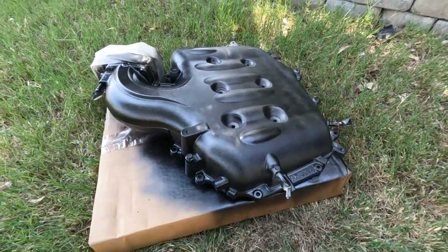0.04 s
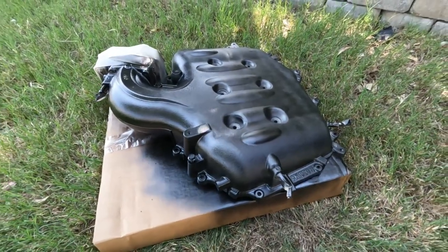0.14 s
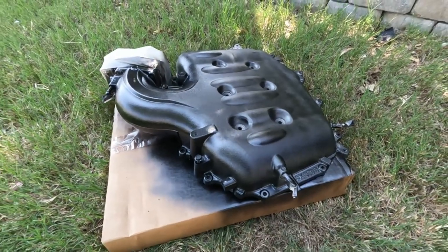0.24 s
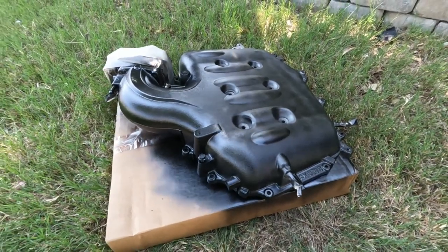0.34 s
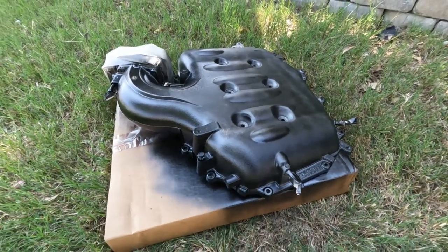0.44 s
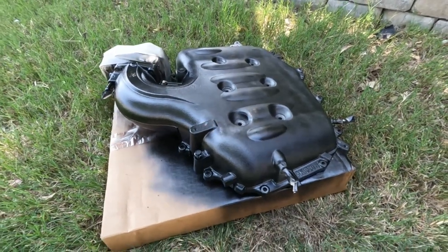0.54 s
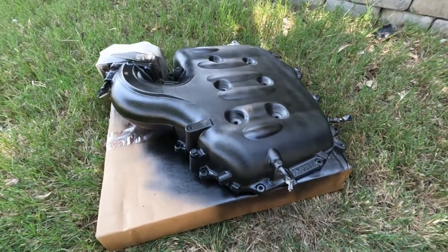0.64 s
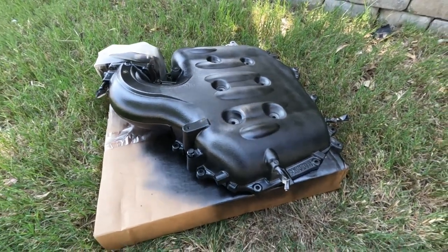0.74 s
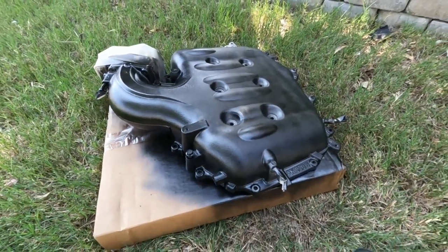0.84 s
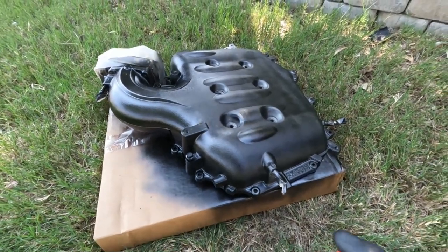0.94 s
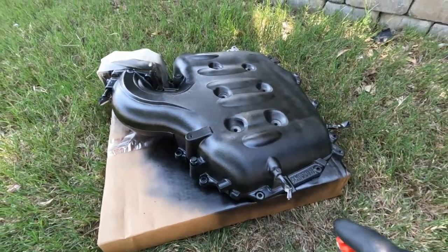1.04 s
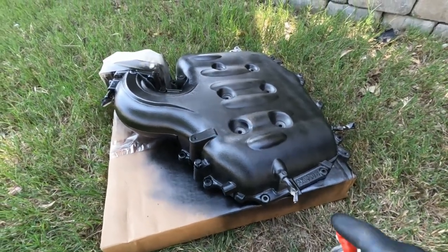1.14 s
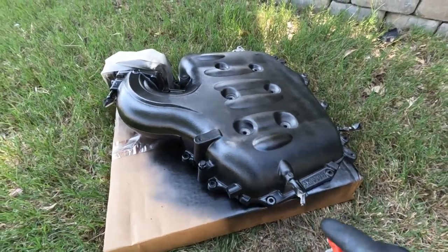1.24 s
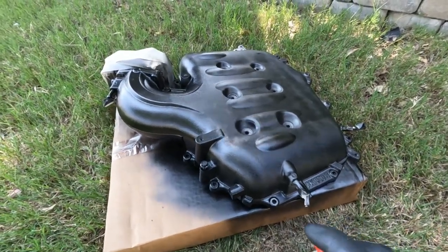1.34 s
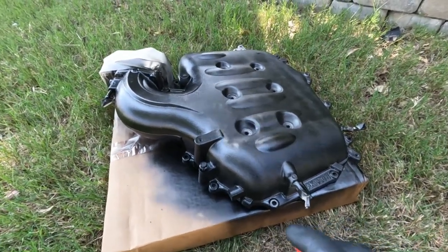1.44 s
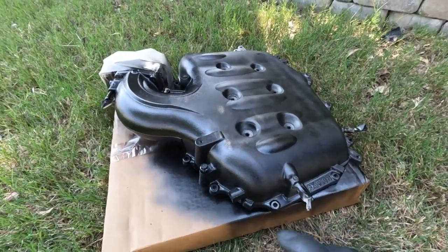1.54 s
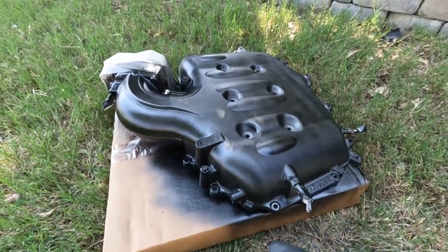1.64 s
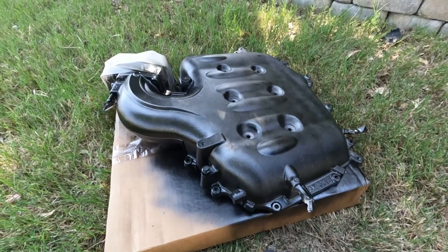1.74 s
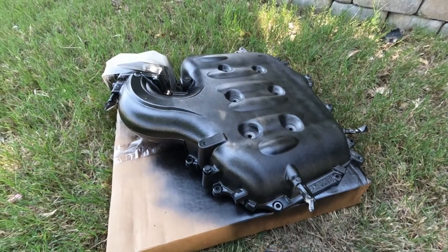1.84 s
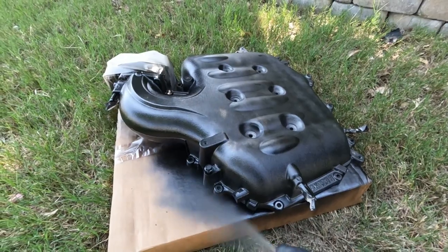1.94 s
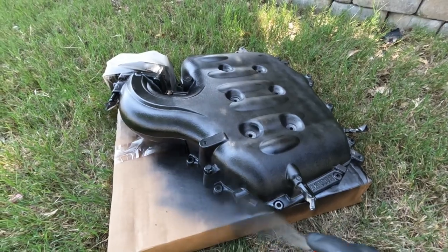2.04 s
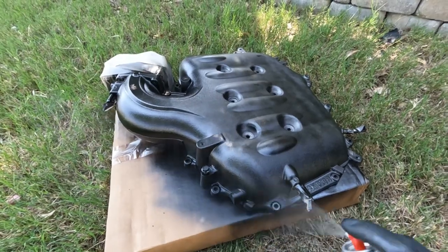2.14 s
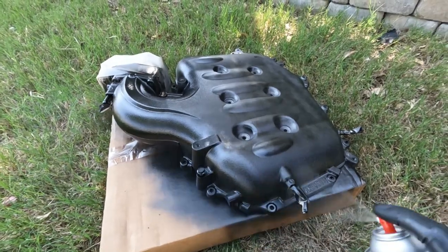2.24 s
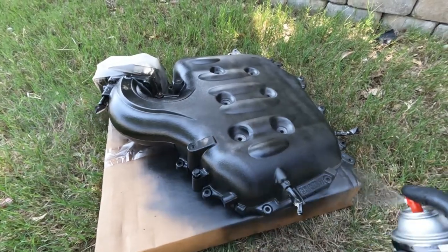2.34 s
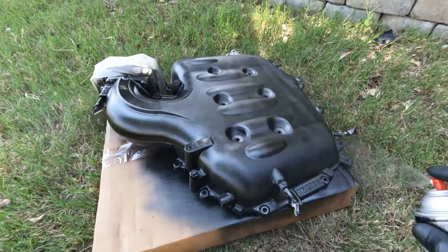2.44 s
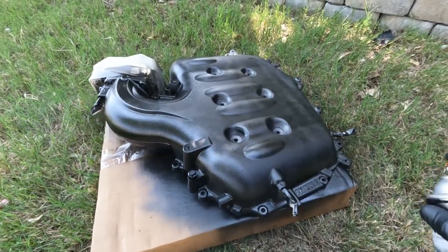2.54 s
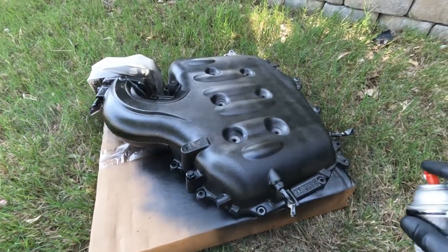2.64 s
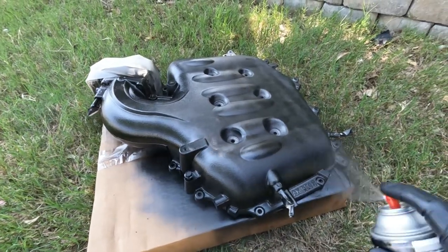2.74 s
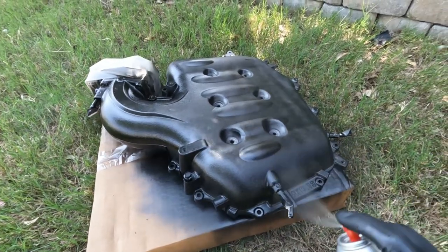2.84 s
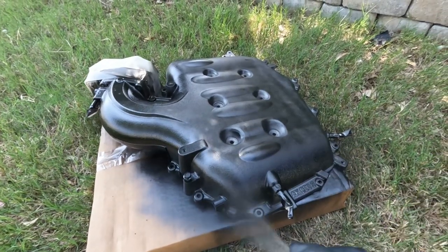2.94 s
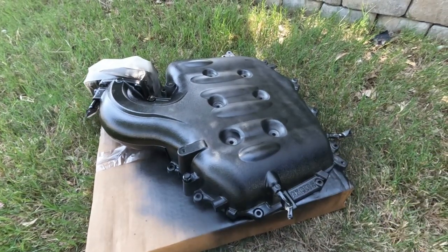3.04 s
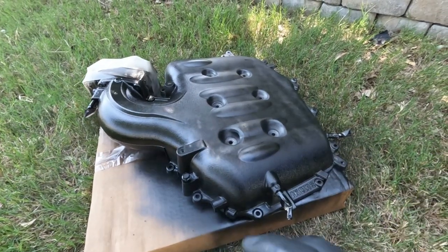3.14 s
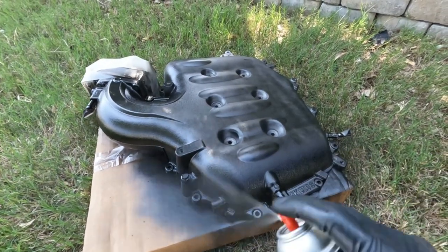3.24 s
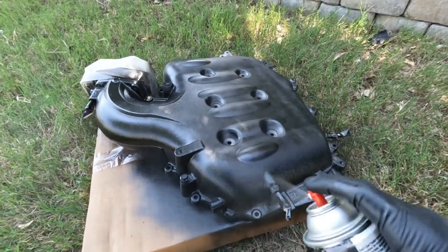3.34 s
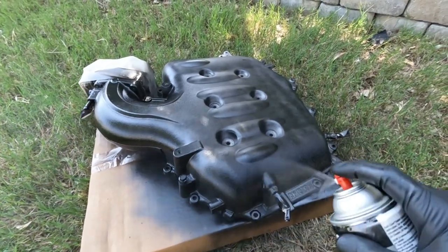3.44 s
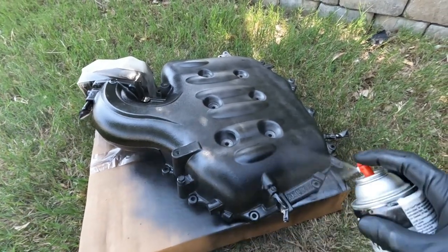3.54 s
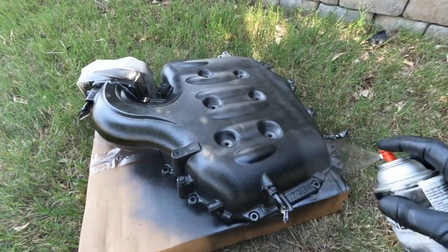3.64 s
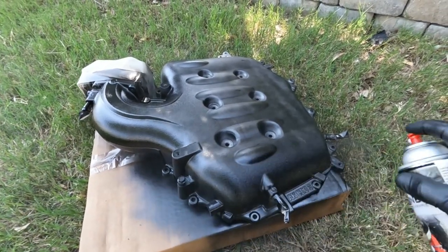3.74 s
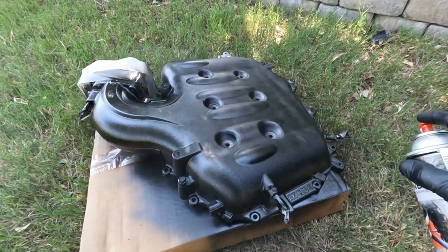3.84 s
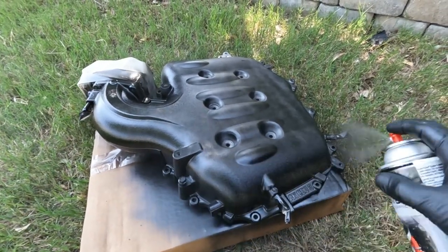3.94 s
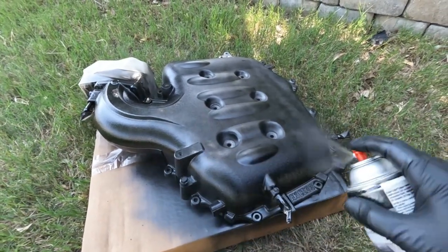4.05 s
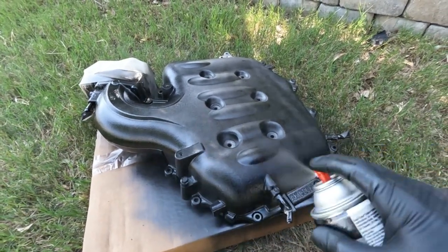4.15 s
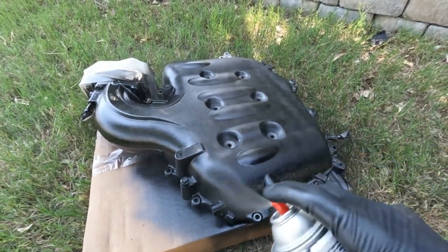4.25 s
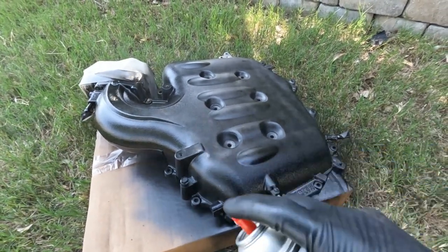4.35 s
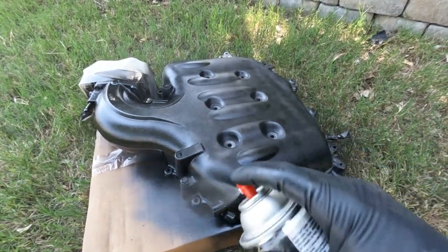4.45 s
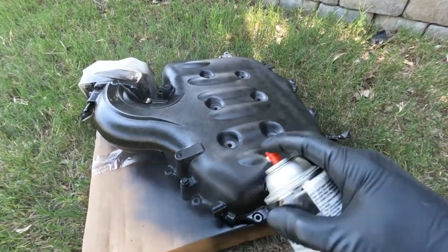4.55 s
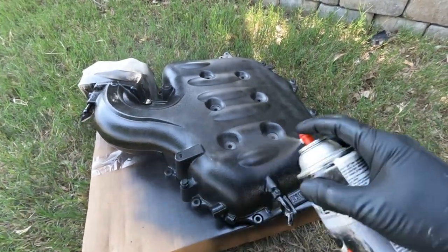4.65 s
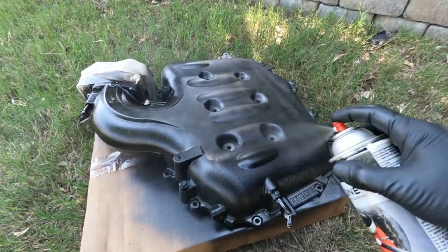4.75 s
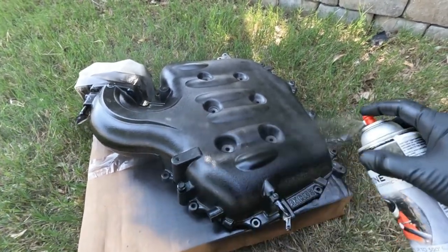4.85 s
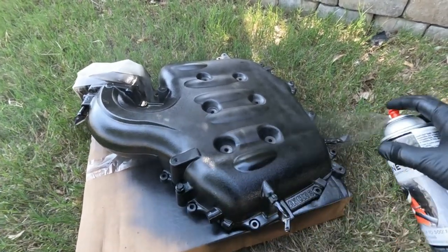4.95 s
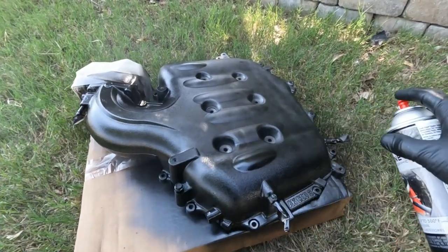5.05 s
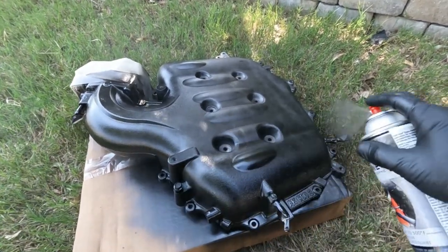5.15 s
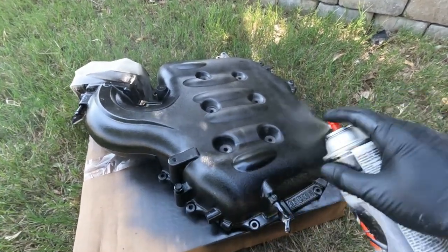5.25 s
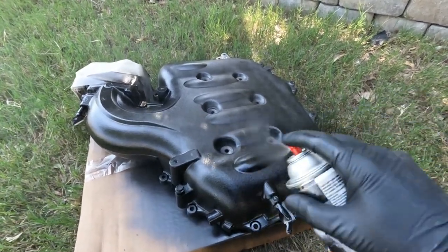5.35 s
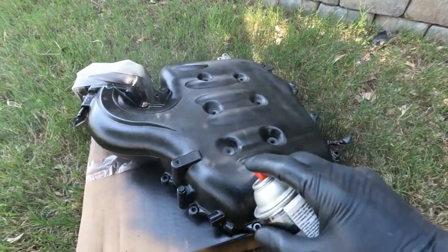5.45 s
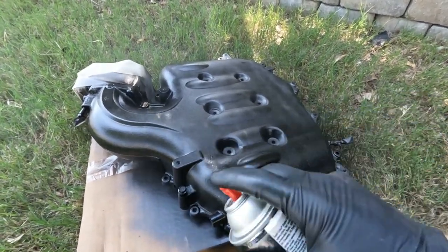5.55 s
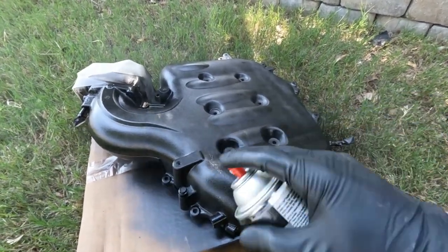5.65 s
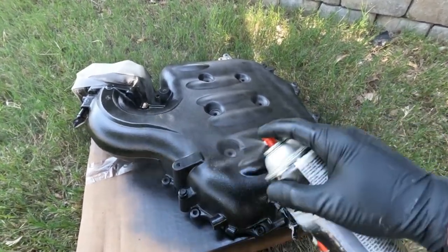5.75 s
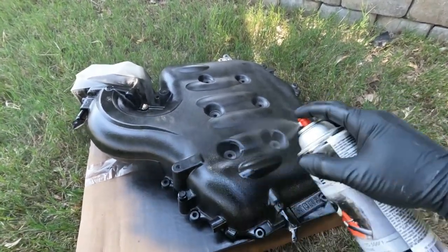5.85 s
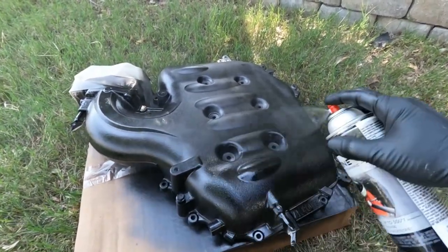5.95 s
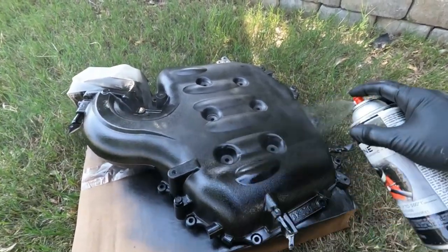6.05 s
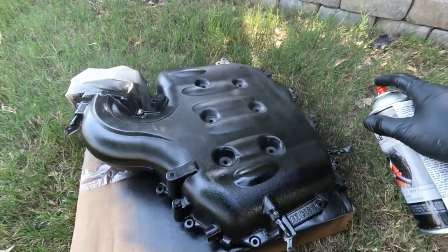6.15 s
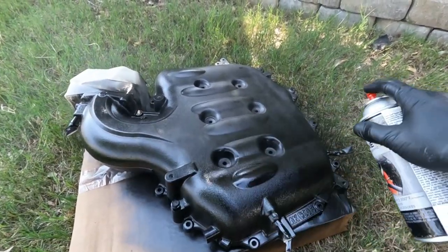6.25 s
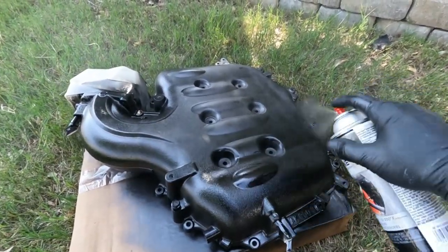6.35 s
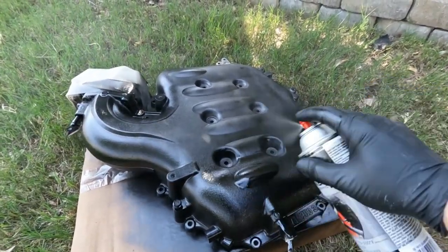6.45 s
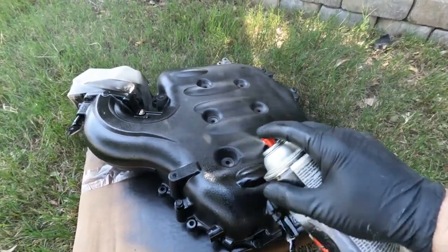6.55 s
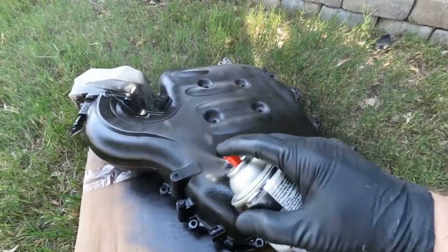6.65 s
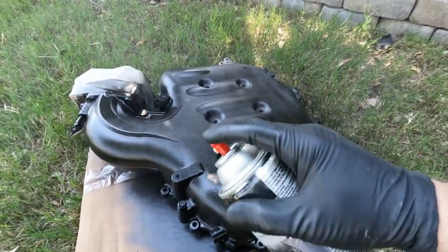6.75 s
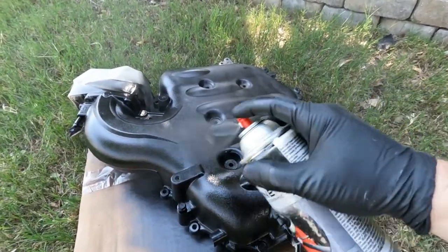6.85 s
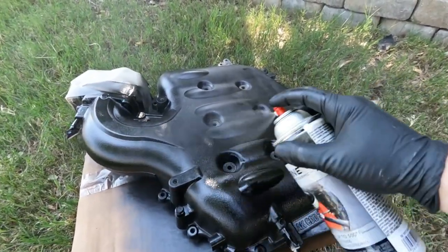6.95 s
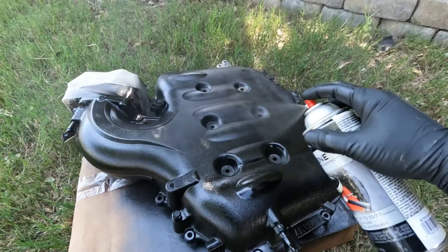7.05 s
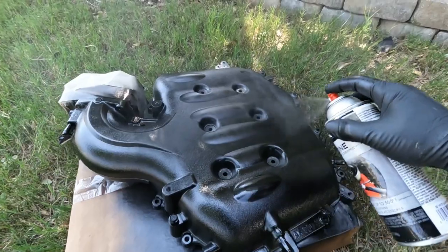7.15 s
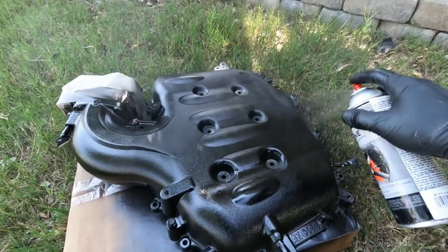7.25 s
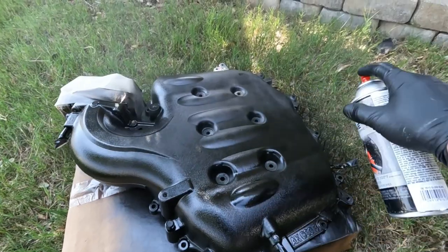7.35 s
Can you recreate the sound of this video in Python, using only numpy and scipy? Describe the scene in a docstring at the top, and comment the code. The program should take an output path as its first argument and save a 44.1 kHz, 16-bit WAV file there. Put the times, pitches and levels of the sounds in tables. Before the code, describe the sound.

Close, dry outdoor sound over quiet air. At 0.1 s a light tick, then at 0.3 s a sharp metallic clack and a rapid scatter of smaller ball knocks in a steel can until 0.45 s. A glove rubs and slides thinly along the can until about 1 s, with small ticks near 0.55 and 0.75 s and a faint falling distant tone. A low far machine hum swells around 1 to 2 s, then recedes. A nozzle click at 1.96 s starts the first spray, fluttering and hollow at its onset, until 2.57 s. Further hisses begin near 2.7, 3.25, 4.0, 4.5, 5.2, 5.7, 6.35 and 6.9 s, each 0.35 to 0.6 s, opening with a spurt and cutting off quickly. Their tone slides with each sweep; later ones are fizzier. Tiny plastic ticks and soft low puffs fall around them.

```python
"""A ball clacks in a steel spray can and a glove rubs and slides along it as the can is picked up.
Then nine sprays hiss over an engine part on a lawn: shaped noise gated by a valve while the hand sweeps,
combed by short echoes off the part and a board. The nozzle, a set of dying modes, ticks around the sprays.
Behind them are soft low puffs, outdoor air noise and the sine-wave hum of a far machine."""
import sys
import numpy as np
from scipy import signal
from scipy.fft import rfft, irfft
from scipy.io import wavfile
from scipy.ndimage import uniform_filter1d

SR = 44100
rng = np.random.default_rng(int(sys.argv[2]) if len(sys.argv) > 2 else 0)


def wav_out(sig):
    """Save sig, one row per channel (or a flat mono array), as 16-bit PCM at SR to the path in sys.argv[1]."""
    wavfile.write(sys.argv[1], SR, np.round(np.clip(np.atleast_2d(sig).T, -1, 1) * 32767).astype(np.int16))


N = 326340
TIME = np.arange(N) / SR

# Sprays, one hand sweep each; sweep is positive away to the right, negative back to the left.
# Levels are averages over the sweep, before the layer gains in spray():
# start_s, length_s, sweep (signed size), hiss_db, fizz_over_hiss_db, rush_over_hiss_db,
# hollow_over_hiss_db, part_echo_left_ms, part_echo_right_ms, part_echo_strength (factor),
# board_echo_ms (at mid-sweep), gap_boost_db
SPRAY_SWEEPS = [ (1.976, 0.59, 0.95, -25, -20.5, -33, -6, 0.82, 0.74, 0.073, 1.2, -1.5),
                (2.734, .338, -0.72, -24.5, -21.5, -28, -15, 0.92, 0.76, 0.092, 1.3, -1.5),
                (3.251, 0.58, 0.84, -24.9, -19, -24.5, -11.5, 0.88, 0.7, .06, 1.5, -2),
                (3.98, 0.39, -0.95, -24.5, -18, -22.5, -20, .815, 0.64, 0.079, 1.3, 1.3),
                (4.518, 0.52, 1.45, -25.5, -15.5, -21.5, -22, 0.91, 0.59, 0.078, 1.54, 1.5),
                (5.194, 0.4, -0.78, -24.5, -16.5, -21.5, -30, 0.58, 0.56, 0.094, 1.26, 3),
                (5.739, 0.4585, 1, -26.5, -13, -19, -30, 0.936, 0.673, 0.069, 1.17, 6.5),
                (6.347, 0.4, -0.95, -26.5, -13, -17, -28, 0.95, 0.64, 0.059, 1.39, 7),
                (6.883, 0.46, 0.88, -26.5, -12, -17.5, -30, 0.74, 0.7, 0.011, 1.08, 4)]
# Ringing modes of the steel can: pitch_hz, level_db (relative), t60_s
CAN_MODES = [(850, -18, 0.031), (1290, -12.5, 0.012), (1725, -13, 0.019), (1930, -13, 0.024),
             (2380, -8.5, 0.013), (2570, -8, 0.0088), (3100, -9, 0.011), (3650, -3, 0.0099),
             (4310, -4.5, 0.0046), (5350, -17, 0.0087), (6130, -15, 0.0063), (7300, -1, 0.0042),
             (8270, -8, 0.0063), (10300, -22, .004), (11960, -28, 0.011)]
# Ball strikes on the can, then (from 0.55 s) small crisp ticks of the handled glove or cap;
# levels before the layer gains: start_s, level_db, favoured_pitch_hz, scrape_db
CLACKS_AND_TICKS = [(0.1212, -24.5, 3400, -49), (0.2887, -4.5, 3360, -33), (0.3099, -15.5, 1880, -38),
                    (0.3313, -17.5, 1850, -39), (0.35, -23, 1850, -41), (0.3628, -28, 1380, -45),
                    (0.368, -10, 3530, -48), (0.3863, -26, 2150, -45), (0.399, -25, 1750, -48),
                    (0.412, -30, 1690, -53), (0.4224, -19, 3640, -47), (0.4454, -25.5, 2530, -48),
                    (0.5506, -36, 4700, -42.5), (0.73, -36, 1650, -40.5), (0.7482, -28.5, 3600, -44),
                    (1.029, -51, 4000, -53), (1.623, -41, 3210, -54), (1.7477, -49, 3500, -51),
                    (1.914, -52, 5500, -54.5)]
# Spectrum of the glove rubbing on steel: pitch_hz, density_db (relative, per Hz)
GLOVE_SPECTRUM = [(250, -25), (600, 3.5), (1200, 0.5), (2000, 7), (2700, -1), (3700, 1.5), (5200, 1.5),
                  (6200, -7.5), (8000, -26), (10500, -20), (12500, -31), (15500, -42)]
# Stereo width chosen for jet and scrapes: near mono through the middle pitches, wide above 11 kHz:
# pitch_hz, side_minus_mid_db
JET_WIDTH = [(60, -11), (300, -18), (600, -27.5), (1500, -34.5), (3000, -61), (6000, -53), (8000, -26.5),
             (10000, -34), (11500, -2), (13000, 1.5), (16000, -4)]
# Stereo width chosen for the outdoor air and the glove: pitch_hz, side_minus_mid_db
AIR_WIDTH = [(60, -50), (110, -65), (200, -71), (380, -51), (700, -41), (1290, -49), (2380, -47),
             (4400, -35), (8120, -15), (15000, -2)]

# change of level over a sweep of size 1 to the right: the hiss recedes, the nozzle turns its fizz to the mic
HISS_SWEEP_DB, FIZZ_SWEEP_DB, RUSH_SWEEP_DB = -5, 9.5, 2


def amp(db):
    """Decibels to gain."""
    return 10 ** (np.asarray(db) / 20)


def evened(x):
    """Scales to rms 1."""
    return x / np.sqrt(np.mean(x ** 2) + 1e-20)


def read(points, hz):
    """A spectrum's value on a log-frequency axis."""
    f, value = np.transpose(points)
    return np.interp(np.log(hz + 1), np.log(f + 1), value)


def follow(rows, t=TIME):
    """Each column of a curve at the times t."""
    s, *columns = np.transpose(rows)
    return [np.interp(t, s, c) for c in columns]


def add(mix, s, sound):
    """Mixes a sound in at s seconds."""
    part = mix[max(round(s * SR), 0):][:len(sound)]
    part += sound[:len(part)]


def wander(rate_hz):
    """Smooth random drift of rms 1, with little movement faster than the rate."""
    hz = np.fft.rfftfreq(N, 1 / SR)
    white = rfft(rng.standard_normal(N))
    return evened(irfft(white * np.exp(-(hz / rate_hz) ** 2), N))


def noise(spectrum, side, patchy_db, colour=None, size=512):
    """Stereo noise of rms 1, patchy in time and pitch, with a chosen width and an optional moving colour."""
    hz = np.fft.rfftfreq(size, 1 / SR)
    t = np.arange(0, N + size, size // 4) / SR
    a, b, c, d, patches = rng.standard_normal((5, len(t), len(hz)))
    patches = uniform_filter1d(patches, size=10, axis=0)
    patches = evened(uniform_filter1d(patches, size=6, axis=1))
    common = a + 1j * b
    apart = amp(read(side, hz)) * (c + 1j * d)
    channels = np.array([common + apart, common - apart])
    channels = channels * amp(read(spectrum, hz) + patchy_db * patches)
    if colour is not None:
        channels = channels * colour(t[:, None], hz)
    x = signal.istft(channels, nperseg=size, noverlap=size * 3 // 4, time_axis=1, freq_axis=2)[1]
    return evened(x[:, :N])


def spray(hiss_db=0, fizz_db=6, rush_db=-.5, hollow_db=-3):
    """The jet hisses, droplets fizz at the nozzle, and the stream rushes over the part and rings in its hollows."""
    # the jet catches a hollow and flares, or is briefly shaded: centre_s, length_s, gain_db (hiss takes half)
    flares = [(1.993, 0.042, 3.5), (2.076, 0.016, 7.5), (2.099, 0.027, -7), (2.126, 0.052, 7.5),
              (4.34, 0.05, 5.5)]
    # spectra of the four layers: pitch_hz, density_db (relative, per Hz)
    hiss_spectrum = [(300, -31.5), (800, -25.5), (1250, -16.5), (1600, -11), (1950, -7), (2350, -6),
                     (2800, -1.5), (4200, 1.5), (5200, -3), (6500, -7), (7200, -19.5), (8000, -25),
                     (9500, -38), (16000, -47)]
    fizz_spectrum = [(3500, -23), (5500, 12), (6500, 10.5), (7300, 8.5), (8000, 0), (8700, -4),
                     (9500, -2.5), (10200, 0), (10800, -3.5), (11400, -15.5), (12000, -16.5), (12800, -18),
                     (14200, -23), (15600, -19.5)]
    rush_spectrum = [(40, -30), (130, -29), (250, -28), (370, 1.5), (450, -2), (540, 8.5), (640, 8.5),
                     (800, -0.5), (1050, -5), (1600, -24), (4000, -49)]
    hollow_spectrum = [(400, -30), (800, -7), (1100, 4.5), (1600, 4.5), (2400, 8), (4000, 9.5), (7000, -4),
                       (12000, -67)]

    _, reach, (level_db, fizz_rel_db, rush_rel_db, hollow_rel_db, *_) = sweeps(TIME)
    flare_db = sum(db * np.exp(-(2 * (TIME - s) / length) ** 4) for s, length, db in flares)
    hiss = amp(hiss_db) * noise(hiss_spectrum, JET_WIDTH, patchy_db=.8, colour=reflections)
    fizz = noise(fizz_spectrum, JET_WIDTH, patchy_db=2.3, colour=reflections)
    fizz = fizz * amp(fizz_db + fizz_rel_db + FIZZ_SWEEP_DB * reach)
    rush = noise(rush_spectrum, JET_WIDTH, patchy_db=0.7)
    rush = rush * amp(rush_db + rush_rel_db + RUSH_SWEEP_DB * reach)
    hollow_gain = np.maximum(amp(flare_db) - 1, amp(hollow_rel_db))
    hollow = amp(hollow_db) * hollow_gain * noise(hollow_spectrum, JET_WIDTH, patchy_db=4.0)
    jet = (hiss + fizz) * amp(flare_db / 2) + rush + hollow
    # paint and gas leave the nozzle unevenly
    sputter_db = .35 * wander(rate_hz=120)
    return jet * valve() * amp(level_db + HISS_SWEEP_DB * reach + sputter_db)


def valve(open_s=.0014, shut_s=0.0021, spurt_db=5, spurt_s=0.0037, dribble_db=-20, dribble_s=0.019):
    """Flow through the valve: it opens with a spurt of stored pressure, shuts quickly, and the stem drains."""
    flow = np.zeros(N)
    for start, length, *_ in SPRAY_SWEEPS:
        stop = start + length
        opening = (1 + np.tanh((TIME - start) / (2 * open_s))) / 2
        closing = (1 + np.tanh((stop - TIME) / (2 * shut_s))) / 2
        dribble = amp(dribble_db) * np.exp(-np.maximum(TIME - stop, 0) / dribble_s)
        spurt = amp(spurt_db * np.exp(-np.maximum(TIME - start, 0) / spurt_s))
        flow += opening * np.maximum(closing, dribble) * spurt
    return flow


def sweeps(t, bend=0.44):
    """The can's place (-.5 left to .5 right), its reach scaled by sweep size, and the columns from the hiss on."""
    rows = np.array(SPRAY_SWEEPS)
    pauses = (rows[:-1, 0] + rows[:-1, 1] + rows[1:, 0]) / 2
    start, length, sweep, *columns = np.moveaxis(rows[np.searchsorted(pauses, t)], -1, 0)
    place = np.sign(sweep) * (np.clip((t - start) / length, 0, 1) - .5)
    # the bend makes the hand move faster on the left than on the right
    reach = abs(sweep) * (place + bend * (np.cos(np.pi * place) - 2 / np.pi) / 2)
    return place, reach, columns


def reflections(t, hz, gap_width_hz=470, gap_share=0.096, left_loss=0.82, order=3):
    """Two short echoes comb the jet, and the gap to the part resonates at one tooth; all slide with the sweep."""
    # share of each pitch that the surfaces throw back: pitch_hz, share (factor)
    shine = [(500, 0.18), (1500, 0.96), (3000, 3.2), (4500, 2.2), (6500, 3.9), (12000, 0.3)]
    echo_bend, echo_end_share = 3.2, 0.73
    board_sweep_ms, board_echo = -0.46, 0.032

    place, _, (*_, left_ms, right_ms, part, board_ms, boost_db) = sweeps(t)
    # the part's echo time changes fastest towards the left; its echo is strongest in mid-sweep
    leftness = np.clip(.5 - place, 0, 1) ** echo_bend
    part_ms = right_ms + (left_ms - right_ms) * leftness
    facing = echo_end_share + (1 - echo_end_share) * np.cos(np.pi * place)
    turn = -2j * np.pi * hz / 1000  # phase per ms of delay
    echoes = part * facing * np.exp(turn * part_ms)
    echoes = echoes + board_echo * np.exp(turn * (board_ms + board_sweep_ms * place))
    # the resonance gathers energy from the other pitches, and weakens towards the left
    gap_hz = order * 1000 / part_ms
    gap_shape = np.exp(-((hz - gap_hz) / gap_width_hz) ** 2) - gap_share
    gap_db = boost_db * facing * (1 - left_loss * leftness) * gap_shape
    return abs(1 + read(shine, hz) * echoes) * amp(gap_db)


def ring(modes, bright_hz, octaves, contact_s=0.00044):
    """Dying modes; the contact favours those near one pitch and rounds the attack."""
    t = np.arange(2048) / SR
    hz, db, t60 = np.transpose(modes)[:, :, None]
    weight = amp(db) / (1 + (np.log2(hz / bright_hz) / octaves) ** 2)
    hz = hz * (1 + 0.0076 * rng.standard_normal(hz.shape))  # each mode lands slightly off pitch
    decay = np.exp(-np.log(1000) * t / t60)
    tone = (weight * decay * np.sin(2 * np.pi * (hz * t + rng.random(hz.shape)))).sum(0)
    tone *= 1 - np.exp(-(t / contact_s) ** 2)
    return tone / np.sqrt(np.mean(tone[:128] ** 2))  # rms 1 over the attack


def strikes(events, modes, gain_db, octaves):
    """Every event rings the same set of modes."""
    out = np.zeros(N)
    for s, db, bright_hz, *_ in events:
        add(out, s, amp(db + gain_db) * ring(modes, bright_hz, octaves))
    return out


def scrapes(gain_db=3, delay_s=0.0012, length_s=0.0014):
    """Each clack or tick has a brief crisp scrape: a short burst of bright noise."""
    # spectrum of the scrape: pitch_hz, density_db (relative, per Hz)
    scrape_spectrum = [(1500, -20), (3000, -15), (4500, 6), (5700, 9), (7200, 3), (8300, -15), (10500, -11),
                       (12500, -24), (15500, -30)]
    bursts = sum(amp(scrape_db) * np.exp(-((TIME - s - delay_s) / length_s) ** 2)
                 for s, _, _, scrape_db in CLACKS_AND_TICKS)
    return amp(gain_db) * bursts * noise(scrape_spectrum, JET_WIDTH, patchy_db=4.0)


def rolling(grains_per_s=900, spread_db=2, ball_db=-1, glove_db=0, rub_db=2.0):
    """As the can moves, the ball's tiny contacts keep it ringing and the glove rubs on it."""
    # movement of the can in the hand, before the ball and glove gains: time_s, level_db
    movement = [(0, -50.5), (.13, -47), (.25, -51), (.42, -47.5), (.6, -56.5), (.76, -54.5), (.88, -57),
                (1.2, -100)]
    contacts = (rng.random(N) < grains_per_s / SR) * rng.standard_normal(N)
    contacts = contacts * amp(spread_db * wander(rate_hz=16))
    ball = evened(signal.oaconvolve(contacts, ring(CAN_MODES, bright_hz=1790, octaves=0.96))[:N])
    glove = amp(rub_db * wander(rate_hz=67)) * noise(GLOVE_SPECTRUM, AIR_WIDTH, patchy_db=1.5)
    return amp(follow(movement)[0]) * (amp(ball_db) * ball + amp(glove_db) * glove)


def slide(width_hz=560, rub_db=2):
    """The glove slips along the steel: a thin band of friction noise, almost steady in pitch, swells and fades."""
    start_s, length_s = .42, .5
    level_db, from_hz, to_hz = -53.5, 4600, 4650

    def progress(t):
        """Share of the slide done, 0 to 1."""
        return np.clip((t - start_s) / length_s, 0, 1)

    def band(t, hz):
        """Bell-shaped band around the slide's pitch."""
        centre_hz = from_hz + (to_hz - from_hz) * progress(t)
        return np.exp(-((hz - centre_hz) / width_hz) ** 2 / 2)

    swell = np.sqrt(abs(np.sin(np.pi * progress(TIME))))
    friction = noise(GLOVE_SPECTRUM, AIR_WIDTH, patchy_db=0.0, colour=band)
    return swell * amp(level_db + rub_db * wander(rate_hz=49)) * friction


def nozzle_ticks():
    """A finger presses or frees the plastic nozzle, which rings very briefly."""
    # modes of the nozzle: pitch_hz, level_db (relative), t60_s
    nozzle_modes = [(2560, 0, .012), (3100, -2, 0.015), (3630, 4, 0.0092), (4450, -2, 0.012),
                    (5440, -6, 0.0095), (7200, -12, .006)]
    # finger moves, level before the gain: start_s, level_db, favoured_pitch_hz
    finger_moves = [(1.9644, -19, 4250), (2.6234, -35, 3300), (2.728, -31, 3750), (3.1034, -40, 3250),
                    (3.1158, -29.5, 3060), (4.4398, -38, 3620), (4.4454, -36, 3950), (4.4867, -46, 3530),
                    (5.075, -28.5, 3760), (5.6346, -31.5, 3100), (5.717, -38, 4310), (5.724, -33, 4000),
                    (6.229, -30, 3330), (6.2876, -40, 3770), (6.7745, -21.5, 3420), (6.870, -41, 3630)]
    return strikes(finger_moves, nozzle_modes, gain_db=-11, octaves=0.75)


def yard(x, t60=0.15, delay_s=0.0029):
    """A short, thin scatter from lawn and paving: sparse random echoes that die away."""
    t = np.arange(SR // 2) / SR
    taps = rng.standard_normal(len(t)) * (rng.random(len(t)) < .1)
    taps = taps * (t > delay_s) * np.exp(-np.log(1000) * t / t60)
    return signal.oaconvolve(x, taps[None] / np.linalg.norm(taps), axes=1)[:, :N]


def puffs(gain_db=-5, length_s=0.021, low_hz=80, high_hz=180):
    """Small eddies brush the microphone: soft swells of low band-passed noise."""
    # puffs of moving air, level before the gain: start_s, level_db
    eddies = [(0.973, -55), (2.11, -51), (2.779, -50), (3.423, -47.5), (4.435, -49.5), (4.886, -48),
              (5.751, -47), (6.086, -43.5), (6.732, -47)]
    swell = sum(amp(db) * np.exp(-((TIME - s - length_s / 2) / length_s) ** 2) for s, db in eddies)
    band = signal.butter(2, [low_hz, high_hz], "bandpass", fs=SR, output="sos")
    return amp(gain_db) * swell * evened(signal.sosfilt(band, rng.standard_normal(N)))


def outdoors(hum_hz=117.5, waver=0.0044):
    """Air noise, the wavering hum of a far machine, and one faint sagging tone."""
    # spectrum of outdoor air: pitch_hz, density_db (relative, per Hz)
    air_spectrum = [(15, -60), (25, -43), (102, -20.5), (170, -12), (242, -8), (405, -17), (607, -16.5),
                    (887, -20.5), (1190, -17), (2050, -17), (2610, -19.5), (3250, -21), (4030, -22.5),
                    (7310, -34.5), (16000, -68)]
    # loudness of the air: time_s, level_db
    air_level = [(0, -51), (.7, -48), (1.0, -52), (1.9, -54.5), (3.2, -55.5), (7.4, -53)]
    # far machine, added to the harmonic levels below: time_s, fundamental_db, overtones_db
    hum_level = [(0, -66, -65), (.7, -56, -54.5), (.95, -50, -48), (1.4, -48, -49), (2.1, -52.5, -61.5),
                 (3.2, -59, -64.5), (6.6, -65, -73.5), (6.85, -62, -48), (7.4, -68, -67)]
    # harmonics of the machine: multiple (of the fundamental), level_db (relative)
    hum_harmonics = [(1, -12), (2, -3), (3, -21.5)]
    # the faint far tone: time_s, pitch_hz, level_db (rms)
    sagging_tone = [(.66, 450, -66), (.73, 431, -54), (.8, 403, -59), (.87, 370, -60), (.96, 350, -78)]

    turns = np.cumsum(hum_hz * (1 + waver * wander(rate_hz=4.85))) / SR
    low_db, upper_db = follow(hum_level)
    hum = np.zeros(N)
    for k, db in hum_harmonics:
        k = round(k)
        harmonic_db = db + (low_db if k == 1 else upper_db) + 0.55 * wander(rate_hz=6.4)
        hum += amp(harmonic_db) * np.sin(2 * np.pi * k * turns)
    sag_hz, sag_db = follow(sagging_tone)
    sounding = (TIME > sagging_tone[0][0]) * (TIME < sagging_tone[-1][0])
    sag = amp(sag_db) * np.sin(2 * np.pi * np.cumsum(sag_hz) / SR) * sounding
    air = amp(follow(air_level)[0]) * noise(air_spectrum, AIR_WIDTH, patchy_db=1.2)
    return air + np.sqrt(2) * (hum + sag)  # root 2 turns rms into sine peaks


def scene():
    """The can and its scatter over the outdoor background."""
    clacks = strikes(CLACKS_AND_TICKS, CAN_MODES, gain_db=-10.5, octaves=0.62)
    handling = clacks + scrapes() + rolling() + slide()
    can = spray() + handling + nozzle_ticks()
    return can + amp(-19.5) * yard(can) + puffs() + outdoors()


def record(dry, notch_hz=9050, notch_width_hz=700, edge_hz=15850):
    """The pickup has a narrow notch in the treble, then a steep upper band limit."""
    notched = signal.lfilter(*signal.iirnotch(notch_hz, notch_hz / notch_width_hz, SR), dry)
    band_limit = signal.firwin(511, edge_hz, window=("kaiser", 9), fs=SR)
    return signal.oaconvolve(notched, band_limit[None], "same")


dry = scene()
out = record(dry)
wav_out(out)
```